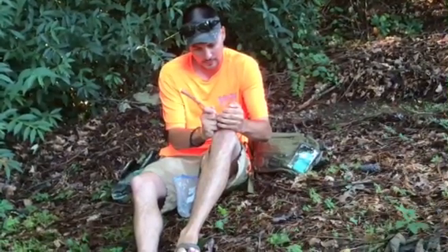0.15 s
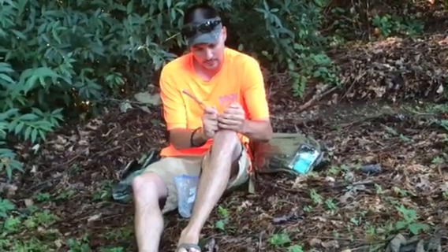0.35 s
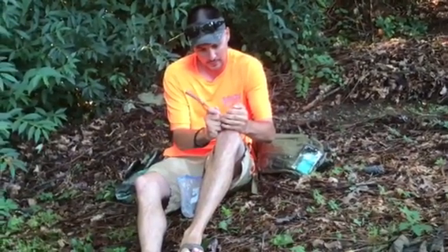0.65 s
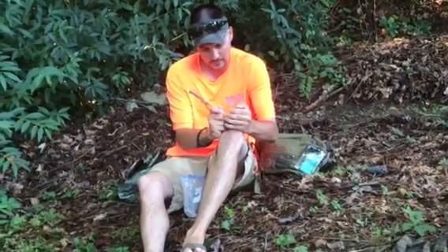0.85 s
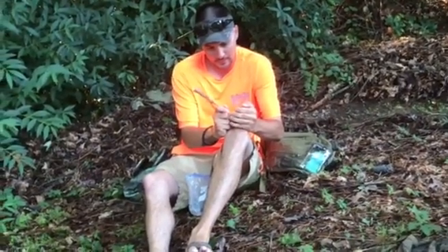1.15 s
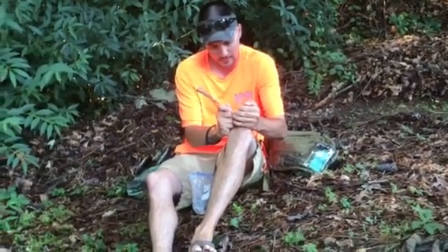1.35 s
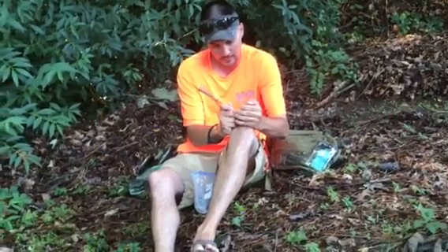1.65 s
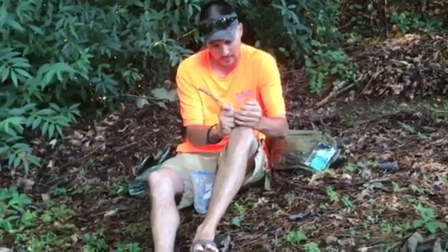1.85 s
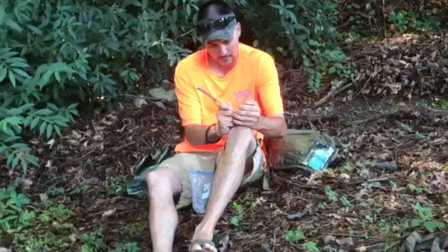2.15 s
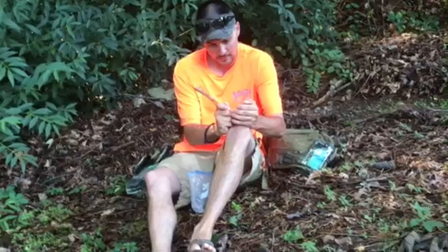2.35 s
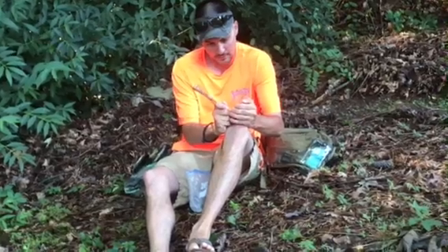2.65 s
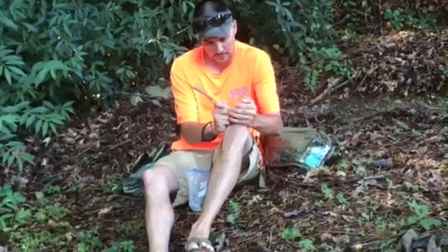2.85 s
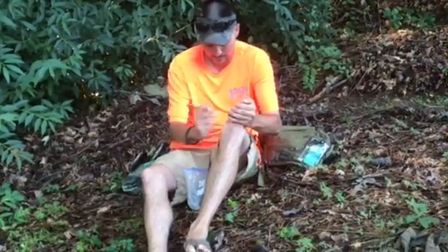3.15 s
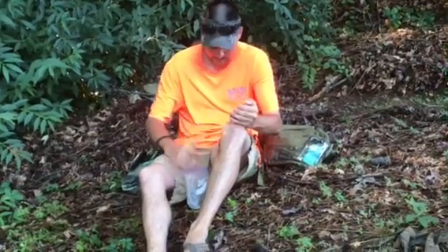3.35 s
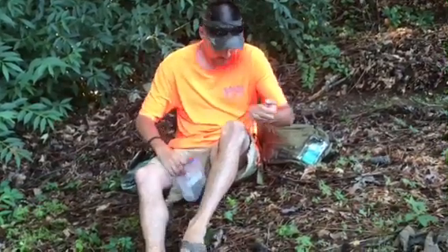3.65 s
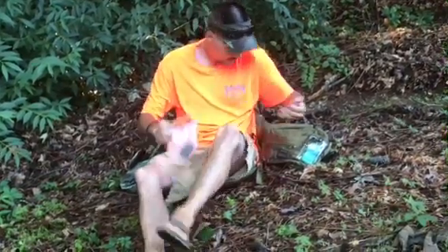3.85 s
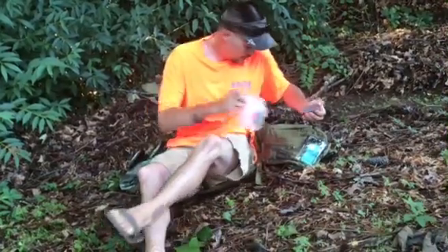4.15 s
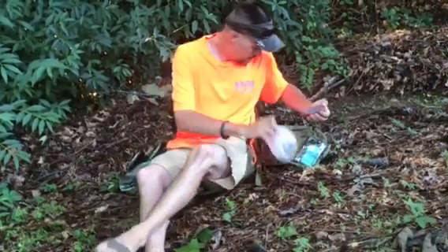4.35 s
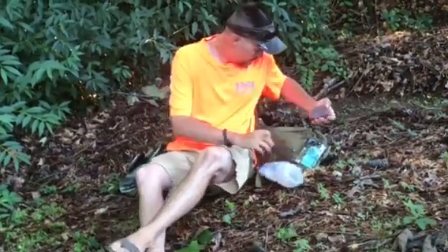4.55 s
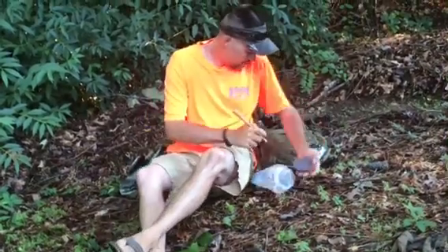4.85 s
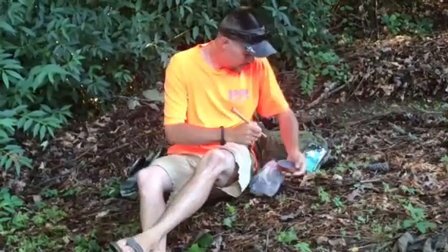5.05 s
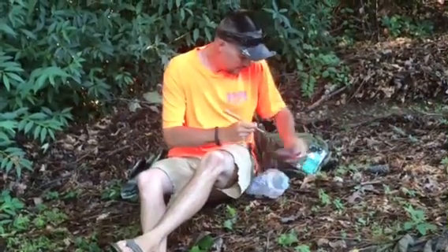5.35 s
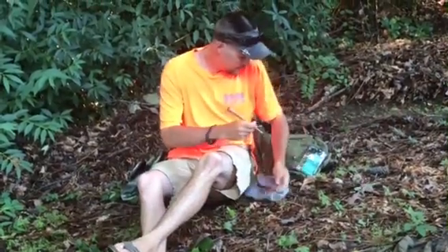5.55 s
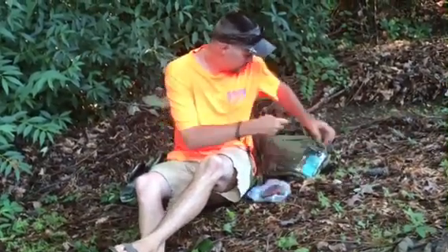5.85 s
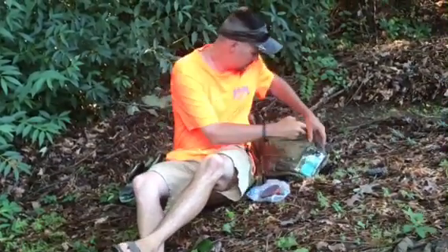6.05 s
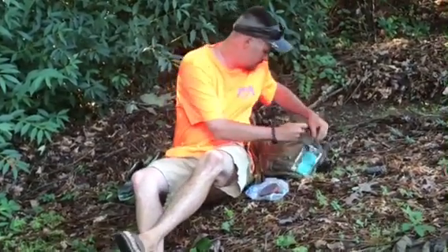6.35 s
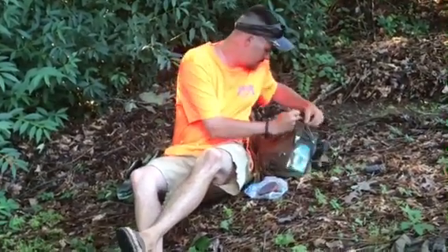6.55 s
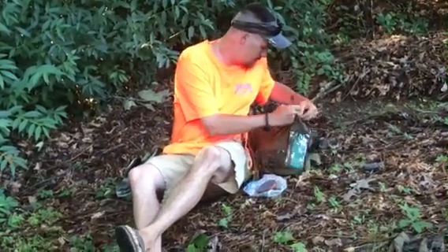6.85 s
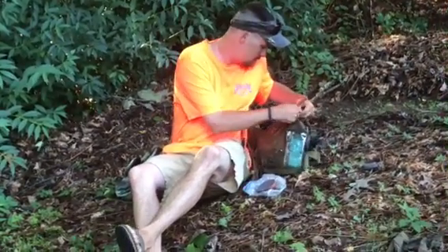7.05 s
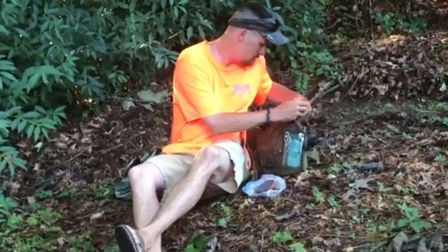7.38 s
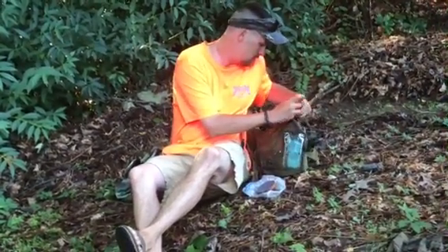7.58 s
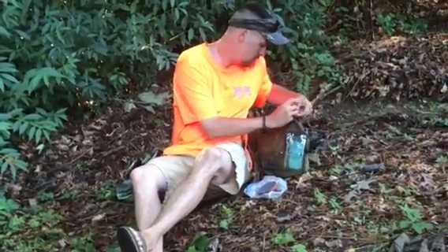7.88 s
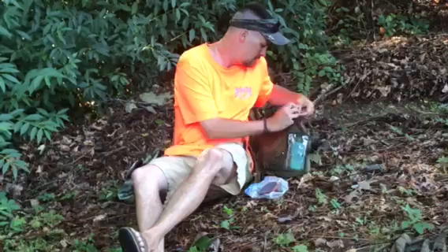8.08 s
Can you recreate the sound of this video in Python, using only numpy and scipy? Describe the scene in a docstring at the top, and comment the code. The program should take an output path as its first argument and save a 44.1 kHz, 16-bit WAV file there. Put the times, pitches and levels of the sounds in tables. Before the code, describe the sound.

Several tiny scratchy chirps open, followed by an even series of woody, hollow turkey yelps from a friction call, growing louder and rougher. Then comes handling: crisp bag crackles, leaf litter stirring, sparse crinkles, a soft thud and another bag crackle. Very high bird notes run through the first part; later a faint far songbird repeats. Open air with faint low rumble, heard from a moderate distance.

```python
"""A few soft squeaks and then seven turkey yelps, as a hunter at the edge of the woods strokes a slate call.
He then picks up a plastic bag, swings it aside and puts the call away in it, among rustling leaves.
Thin bird whistles, as gliding sine tones, carry through the trees over a low distant rumble of shaped noise.
Yelps are stick-slip pulse trains through the resonances of the pot; bag and leaves are random clicks
through the response of film and litter; decaying noise scatters most of these sounds among the trees."""
import sys
import numpy as np
from scipy import signal
from scipy.fft import rfft, irfft
from scipy.io import wavfile
from scipy.ndimage import uniform_filter1d

SR = 44100
rng = np.random.default_rng(int(sys.argv[2]) if len(sys.argv) > 2 else 0)


def log_audio(samples):
    """Write samples as a 16-bit WAV file to the path given in sys.argv[1]."""
    # one column per channel
    frames = np.atleast_2d(samples).T
    # limit to full scale, then quantise
    limited = np.clip(frames, -1, 1)
    pcm = np.round(limited * 32767).astype(np.int16)
    wavfile.write(sys.argv[1], SR, pcm)


N = 362502
TIME = np.arange(N) / SR

# strokes of the striker on the slate: start_s, length_s, pressure_db, fade_db (over the stroke),
# held_hz, climb_hz (over the stroke), rasp (0-1), edge_db (strength of the upper partials)
STROKES = [ (.149, 0.022, -29.5, 2.5, 1062, 40, .25, -2), (0.195, .024, -28.5, -1, 871, 3.5, .05, -7),
           (0.237, 0.018, -37.5, -2.5, 1034, -3.5, .11, -8), (0.317, 0.026, -34, 2.5, 996, -41, .1, -11),
           (0.352, .026, -33.5, -4, 909, 57.5, .1, -14), (0.44, .024, -41.5, -10, 990, -40, .22, -20),
           (.474, .076, -32.5, 13.5, 725, -60, .3, -15), (0.866, 0.028, -27, -3.5, 914, 16, .04, 8.5),
           (0.897, 0.069, -26.5, 2.5, 723.5, 81, .1, 2), (1.217, .079, -23, 3, 932, 55.5, .14, 5.5),
           (1.529, 0.09, -25.5, 1, 724.7, -46, .17, 4.5), (1.852, .087, -22.5, 8, 751.3, -19.5, 0.18, 3),
           (2.17, .089, -21.5, 5.5, 767.7, -10.5, 0.4, 5.5),
           (2.497, 0.076, -22.5, 9.5, 810, 70.5, 0.44, -1), (2.789, .075, -21.5, 2, 784.6, 36, .42, -2.5)]


def amp(db):
    """Level to amplitude: 20 dB is a factor of ten."""
    return 10 ** (np.asarray(db) / 20)


def unit(x):
    """Normalization to an rms of 1."""
    return x / np.sqrt(np.mean(x ** 2) + 1e-20)


def add(mix, s, sound):
    """Superposition: adds a sound into the mix, in place, from time s in seconds."""
    part = mix[max(round(s * SR), 0):][:len(sound)]
    part += sound[:len(part)]


def shape(points, hz):
    """Spectral envelope: gain at the given frequencies, interpolated in dB over log frequency."""
    f, db = np.transpose(points)
    return amp(np.interp(np.log(hz + 1), np.log(f + 1), db))


def noise(points):
    """Spectral shaping: steady Gaussian noise with the given envelope, at rms 1."""
    spectrum = rfft(rng.standard_normal(N))
    return unit(irfft(spectrum * shape(points, np.fft.rfftfreq(N, 1 / SR)), N))


def wander(rate_hz):
    """Low-pass random fluctuation at rms 1, fading out above about the given rate."""
    hz = np.fft.rfftfreq(N, 1 / SR)
    spectrum = rfft(rng.standard_normal(N))
    return unit(irfft(spectrum * np.exp(-(hz / rate_hz) ** 2), N))


def ring(gain):
    """Minimum phase: the causal impulse response whose phase follows from its gain over frequency."""
    both_sides = np.r_[gain, gain[-2:0:-1]]
    log_gain = np.log(np.maximum(both_sides, 1e-5))
    # the Hilbert transform of the log gain gives the phase
    spectrum = np.exp(np.conj(signal.hilbert(log_gain)))
    return np.fft.ifft(spectrum).real[:len(gain)]


def through(x, response):
    """Linear filtering: convolves with an impulse response and keeps the scene's length."""
    return signal.oaconvolve(x, response)[:N]


def woods(x, t60, rise):
    """Diffuse scattering from leaves and trunks: noise that builds up and decays 60 dB in t60 seconds."""
    t = TIME[:SR]
    tail = rng.standard_normal(SR) * amp(-60 * t / t60) * (1 - np.exp(-t / rise))
    return through(x, tail / np.linalg.norm(tail))


def ease(x):
    """Sigmoid transition from 0 to 1 around x = 0."""
    return .5 + .5 * np.tanh(x / 2)


def moves(rows):
    """Amplitude envelope of movements: each swells as a Gaussian and decays exponentially."""
    envelope = 0
    for s, rise, fall, db in rows:
        swell = (np.minimum(TIME - s, 0) / rise) ** 2
        decay = np.maximum(TIME - s, 0) / fall
        envelope = envelope + amp(db) * np.exp(-swell - decay)
    return envelope


def crackle(per_s, spread_db):
    """Poisson-like impulse noise: random tiny clicks, most weak and a few strong, at rms 1."""
    size = amp(spread_db * np.minimum(rng.exponential(1, N), 4)) * rng.choice([-1, 1], N)
    return unit(size * (rng.random(N) < per_s / SR))


def outdoors(rumble_swell_db=0.85, drone_swell_db=1.05):
    """Broadband ambience: a soft wash of open air over a distant drone and rumble that swell at random."""
    # spectrum of the open air: frequency_hz, relative_density_db
    air_spectrum = [(70, -6), (125, -3.5), (165, -1), (340, -6.5), (500, -8.5), (1100, -9.5), (2000, -20),
                    (3900, -23.5), (5000, -29), (7000, -31), (8800, -36.5), (10500, -42), (12500, -39),
                    (15800, -43.5)]
    # spectrum of the faint far drone: frequency_hz, relative_density_db
    drone_spectrum = [(60, -46.5), (130, -36), (175, 1.5), (205, 3), (240, -4.5), (295, 0.5), (370, 1),
                      (430, -5), (560, -32), (1200, -86)]
    # spectrum of the distant rumble: frequency_hz, relative_density_db
    rumble_spectrum = [(20, -35.5), (32, -16), (42, -12.5), (58, 2.5), (85, -0.5), (105, -9), (120, -2.5),
                       (150, -35.5), (300, -69.5), (700, -95)]
    # slow level of the rumble, before its random swell: time_s, level_db
    rumble_course = [(0, -54.5), (1.6, -51.5), (2.3, -54.5), (3.1, -51), (4.3, -54), (5.4, -51),
                     (6.2, -53.5), (7.3, -52.5), (8.2, -59)]
    # the drone grows slowly, by 0.29 dB per second
    drone_db = -62.5 + 0.29 * TIME + drone_swell_db * wander(rate_hz=4.0)
    rumble_db = np.interp(TIME, *np.transpose(rumble_course)) + rumble_swell_db * wander(rate_hz=3.7)
    drone = amp(drone_db) * noise(drone_spectrum)
    rumble = amp(rumble_db) * noise(rumble_spectrum)
    return amp(-56.5) * noise(air_spectrum) + drone + rumble


def birds(notes, glide_hz, waver_hz, t60, direct_db, scatter_db):
    """Frequency modulation: thin sine notes waver, glide up to pitch by glide_hz, and scatter in the trees."""
    song = np.zeros(N)
    tremble_hz = waver_hz * wander(rate_hz=90)
    for s, length, pitch_hz, db in notes:
        t = np.arange(0, length, 1 / SR)
        tremble_here = tremble_hz[max(round(s * SR), 0):][:len(t)]
        hz = pitch_hz - glide_hz * (1 - t / length) ** 2 + tremble_here
        tone = np.sin(2 * np.pi * np.cumsum(hz) / SR)
        add(song, s, amp(db) * signal.windows.tukey(len(t), .4) * tone)
    return amp(direct_db) * song + amp(scatter_db) * woods(song, t60=t60, rise=0.0058)


def striker(land=0.0045, catch=0.0036, rasp_catch=1.8, leave=0.0037, release=0.0037,
            dig_at=0.022, dig=0.024, tremor_db=0.82):
    """Bow-like control of friction by the hand: pressure, bite, pitch, rasp and edge; times in seconds."""
    touch_hz, bite_s = 1149, 0.0073
    lift_hz, lift_s, lift_share = 1072, .008, .62
    # each instant follows the nearest stroke
    starts, lengths = np.transpose(STROKES)[:2]
    midgaps = (starts[1:] + (starts + lengths)[:-1]) / 2
    nearest = np.searchsorted(midgaps, TIME)
    start, length, db, fade_db, held_hz, climb_hz, rasp, edge_db = np.array(STROKES)[nearest].T
    t = TIME - start
    progress = np.clip(t / length, 0, 1)
    # raspy strokes catch faster
    landing = ease((t - land) * (1 + rasp_catch * rasp) / catch)
    contact = landing * ease((length - leave - t) / release)
    pressure = contact * amp(db - fade_db * progress + tremor_db * wander(rate_hz=49))
    biting = np.exp(-((t - dig_at) / dig) ** 2)
    # the pitch starts high as the tip skates, drops as it bites and rises again as it lifts
    pitch = held_hz + climb_hz * (progress - .5)
    pitch += (touch_hz - pitch) * np.exp(-(np.maximum(t, 0) / bite_s) ** 2)
    pitch += (lift_hz - pitch) * lift_share * np.exp(-(np.maximum(length - t, 0) / lift_s) ** 2)
    return pressure, biting, pitch, rasp, edge_db


def slate_call(wobble=.065, jitter=0.047, shimmer=0.14, grit_db=6.0, smear=0.077,
               bite_edge_db=8, edge_drift_db=3, scatter_db=-24, drag_db=-25):
    """Stick-slip friction: the striker sticks and slips, and each slip kicks the resonances of the pot."""
    # resonances of the slate and its pot: frequency_hz, width_hz, gain_db
    pot_modes = [(698, 220, -23.5), (1107, 550, -14), (1554, 167, -10), (1747, 180, 7), (1889, 324, 0),
                 (2065, 135, -2.5), (2222, 300, -8), (2827, 200, -20.5), (3097, 130, -17), (3493, 486, -21),
                 (4326, 330, -37.5), (5230, 410, -40), (6030, 290, -39.5), (7140, 240, -46.5),
                 (9200, 2400, -61), (13700, 10000, -67)]
    # dry hiss of the tip dragging over the stone: frequency_hz, relative_density_db
    drag_spectrum = [(1000, -23), (2700, 11), (4200, 6.5), (5000, -5), (7000, -9), (9000, -17.5),
                     (15000, -20)]
    # echoes from the ground and near trunks: delay_s, gain_db
    echoes = [(.0045, -42.5), (.013, -22.5), (.027, -21), (.044, -25.5), (.071, -26), (.128, -35)]
    pressure, biting, pitch, rasp, edge_db = striker()
    # the hand wobbles the pitch; the grain of the stone makes single slips uneven in timing and strength
    slip_hz = pitch * (1 + rasp * wobble * wander(rate_hz=55))
    turns = np.cumsum(slip_hz) / SR + jitter * rasp * wander(rate_hz=150)
    # slips are sharpest while the tip digs in, which brightens the upper partials
    edge_db = edge_db + bite_edge_db * (biting - .5) + edge_drift_db * wander(rate_hz=50)
    # the finest timing errors blur only the upper partials
    blur = smear * (rasp + 0.072) * wander(rate_hz=160)
    slips = np.zeros(N)
    for k in range(1, 15):
        # 0 for partials below 2300 Hz, 1 above 4500 Hz
        upper = np.clip((k * pitch - 2300) / 2200, 0, 1)
        slips += amp(edge_db * upper) * np.cos(2 * np.pi * k * (turns + upper * blur))
    drive = slips * (1 + shimmer * rasp * wander(rate_hz=170))
    # each slip throws a puff of bright grit
    grit = noise([(700, -28), (2000, -15.5), (3200, -6.5), (4600, 4.0), (7000, -1), (15000, -4)])
    puffs = unit(np.exp(-(turns % 1) / 0.72))
    drive += amp(grit_db + 0.31 * edge_db) * (rasp + 0.045) * (1 + biting) * grit * puffs
    hz = np.linspace(0, SR / 2, 2049)
    pot = sum(amp(db) / (1 + (2 * (hz - f) / width) ** 2) ** 1.75 for f, width, db in pot_modes)
    direct = through(pressure * drive, ring(pot))
    direct += amp(drag_db) * pressure * rasp * (.5 + biting) * noise(drag_spectrum)
    heard = direct + amp(scatter_db) * woods(direct, t60=0.99, rise=0.025)
    for delay, db in echoes:
        add(heard, delay, amp(db) * direct)
    return heard


def touches(scrape_db=-23, fade=0.0048):
    """Friction noise on contact: the dry tip scrapes as it lands, louder the harder the stroke."""
    contact = np.zeros(N)
    t = TIME[:SR // 10]
    burst = (1 - np.exp(-t / 0.0038)) * np.exp(-t / fade)
    for s, length, db, *_ in STROKES:
        add(contact, s + 0.0023, amp(db + scrape_db) * burst)
    scrape = noise([(900, -18), (2600, -13.5), (3400, 6.5), (4100, 7.5), (5000, -14.5), (8500, -24), (15000, -27)])
    return contact * scrape * (1 + 0.38 * wander(rate_hz=460))


def film_patch(hz, colour_db=3):
    """Modal response of one random patch of the bag; patches differ most in the treble."""
    # broad response of the plastic film: frequency_hz, relative_gain_db
    film = [(300, -17), (900, 3.5), (1500, 2), (2500, 2), (4000, -2), (7000, -3), (10000, -7.5),
            (15500, -12)]
    # resonances of the stiff film: frequency_hz, width_hz, boost_db
    film_modes = [(2490, 450, 4.5), (3920, 1100, 6), (5940, 200, 2)]
    ripple = unit(uniform_filter1d(rng.standard_normal(len(hz)), size=24))
    own_db = colour_db * ripple * np.minimum(hz / 4000, 1)
    shared_db = sum(db / (1 + (2 * (hz - f) / width) ** 2) for f, width, db in film_modes)
    response = ring(shape(film, hz) * amp(own_db + shared_db))
    return response / np.linalg.norm(response)


def bag(snap_db=-1, flutter=0.0023, scatter_db=-9, count=8):
    """Buckling of thin film: creases snap, each ringing its own patch, over a bed of fine crinkles."""
    # the bag is grabbed, lifted, swung, dropped, brushed, filled and nudged:
    # height_s (time of the height), rise_s, fall_s, level_db
    crumples = [(3.625, 0.011, 0.028, -53.5), (3.76, 0.033, 0.02, -57.5), (4.1, 0.23, .1, -61),
                (4.52, .03, .025, -66), (4.587, 0.0074, 0.0074, -52), (4.85, 0.37, .25, -76),
                (5.19, .03, .02, -68), (5.66, 0.028, 0.045, -57), (5.755, 0.034, .035, -60.5),
                (6.55, .35, 1.5, -76.5)]
    # the loudest creases snapping over: start_s, level_db (peak, before snap_db)
    snaps = [(3.6194, -44), (3.624, -42), (3.643, -37), (3.651, -40), (3.6892, -33), (3.7457, -41),
             (3.823, -42), (3.873, -42), (3.97, -45), (4.257, -46), (4.298, -47), (4.591, -39),
             (4.7106, -48), (5.028, -50), (5.611, -43), (5.6783, -40.5), (5.725, -37), (5.7558, -35)]
    hz = np.linspace(0, SR / 2, 513)
    crinkles = sum(through(crackle(per_s=190, spread_db=3.0), film_patch(hz)) for _ in range(count))
    direct = moves(crumples) * unit(crinkles)
    t = TIME[:SR // 50]
    for s, db in snaps:
        kick = rng.standard_normal(len(t)) * np.exp(-t / flutter)
        snap = np.convolve(kick, film_patch(hz))
        add(direct, s, amp(db + snap_db) * snap / abs(snap).max())
    return direct + amp(scatter_db) * woods(direct, t60=0.19, rise=0.0017)


def leaves():
    """Fracture and friction impulses: dry leaves rub and break on the ground."""
    # response of the leaf litter: frequency_hz, relative_gain_db
    litter_response = [(400, 3), (800, 2.5), (1200, 7.5), (1700, -2.5), (2500, 4), (3200, -6.5),
                       (4200, 1.5), (4900, -4), (5700, 0), (7200, -14), (15000, -58)]
    # litter stirred by the hand, a sliding leg and the bag: height_s (time of the height), rise_s, fall_s, level_db
    slides = [(3.68, .06, 0.28, -59.5), (4.11, 0.11, 0.12, -57.5), (5.75, .04, 0.042, -54.5)]
    litter = ring(shape(litter_response, np.linspace(0, SR / 2, 513)))
    return moves(slides) * unit(through(crackle(per_s=1200, spread_db=3.0), litter))


def bump(s=5.058, db=-50, peak_s=0.01):
    """Damped soft impact: a dull bump as the hand meets the pack, strongest peak_s after its onset."""
    t = TIME[:SR // 5]
    blow = np.zeros(N)
    add(blow, s, amp(db) * (t / peak_s) * np.exp(1 - t / peak_s))
    return blow * noise([(40, -30), (110, -16), (240, 5), (400, -8), (900, -33), (3000, -80)])


def far_phrase(start=6.68, step=.105, length=0.076, top_hz=3240, dip_hz=380, dip_at=.11, dip_s=.12,
               db=-72, count=9):
    """Melodic contour: evenly spaced notes of a far songbird that dip early and then hold their pitch."""
    notes = []
    for t in step * np.arange(count):
        pitch_hz = top_hz - dip_hz * np.exp(-((t - dip_at) / dip_s) ** 2)
        notes.append((start + t, length, pitch_hz, db))
    return notes


def scene():
    """Superposition of the call, the handling noises and the woods around them."""
    # birds' notes: start_s, length_s, pitch_hz (reached at the end), level_db (before direct and scatter gains)
    # thin, very high notes
    whistle_notes = [(0, 0.12, 10160, -62), (.2, 0.14, 10060, -61), (.42, 0.11, 10040, -64.5),
                     (.65, 0.13, 10080, -61), (.95, 0.098, 10120, -60), (1.14, 0.1, 10290, -62),
                     (1.38, 0.16, 10010, -63.5), (1.61, 0.18, 10040, -64), (1.84, .2, 10180, -69.5),
                     (2.475, 0.18, 9980, -67)]
    # lower, buzzier calls of another bird
    seet_notes = [(1.01, .07, 7220, -65), (4.12, 0.069, 7600, -62), (4.2, .054, 8170, -57),
                  (5.68, .15, 8000, -61.5), (6.77, .2, 7920, -55)]
    # short high chips from a bird close by
    chip_notes = [(6.605, 0.028, 7050, -57), (7.375, .018, 7020, -61)]
    whistles = birds(whistle_notes, glide_hz=231, waver_hz=45.8, t60=0.93, direct_db=-5.0, scatter_db=-3.0)
    seets = birds(seet_notes, glide_hz=250, waver_hz=161, t60=0.72, direct_db=-5, scatter_db=-4)
    chips = birds(chip_notes, glide_hz=0, waver_hz=50, t60=0.37, direct_db=-6.5, scatter_db=-17)
    far_song = birds(far_phrase(), glide_hz=80.4, waver_hz=104, t60=0.66, direct_db=-1.0, scatter_db=6.0)
    ambience = outdoors() + whistles + seets + chips + far_song
    call = slate_call() + touches()
    handling = bag() + leaves() + bump()
    return (ambience + call + handling)[None]


def record(dry, edge_hz=15900):
    """Band limitation: a linear-phase low-pass removes the sound above edge_hz."""
    lowpass = signal.firwin(511, edge_hz, window=("kaiser", 9), fs=SR)
    return signal.oaconvolve(dry, lowpass[None], "same")


dry = scene()
out = record(dry)
log_audio(out)
```